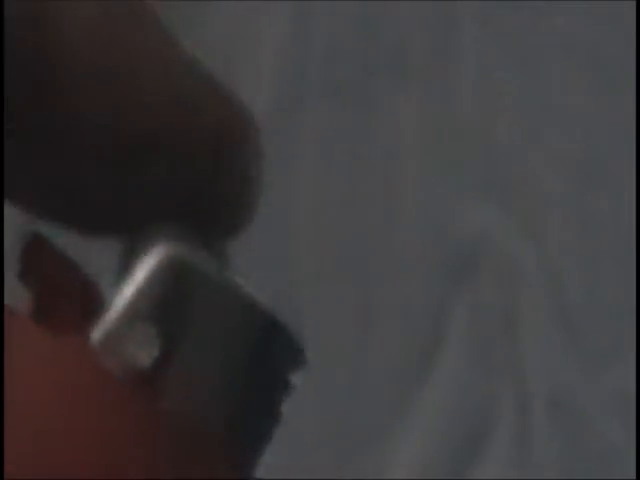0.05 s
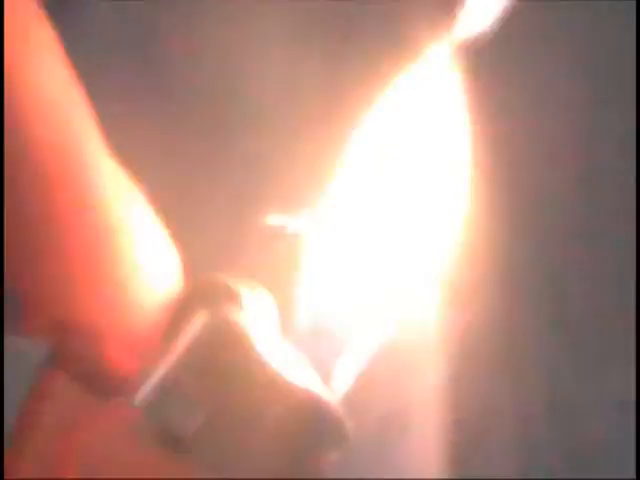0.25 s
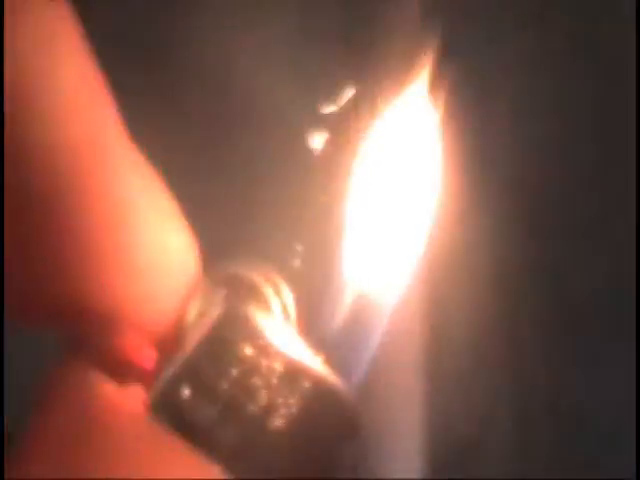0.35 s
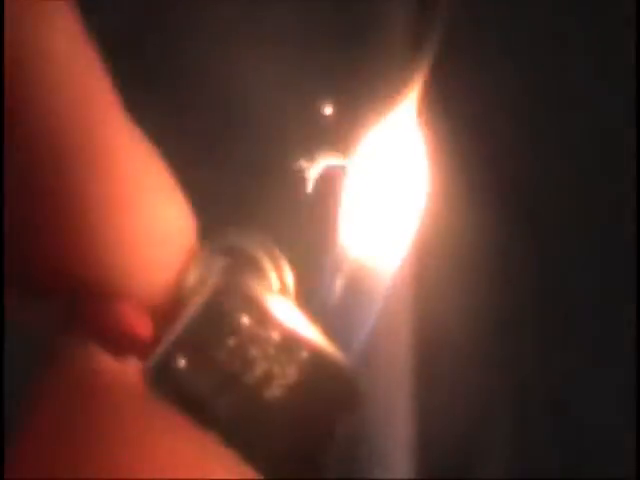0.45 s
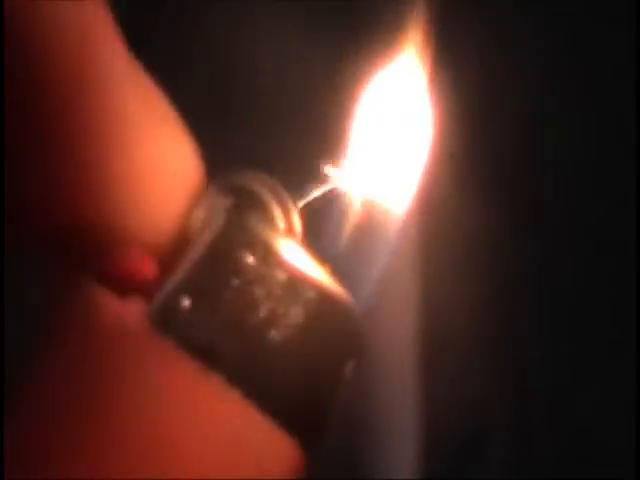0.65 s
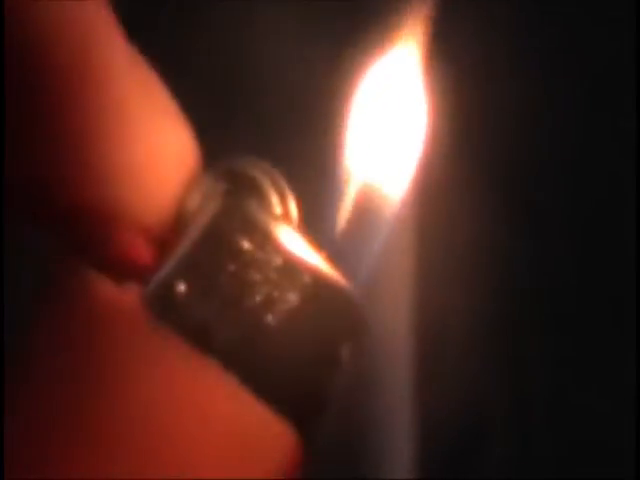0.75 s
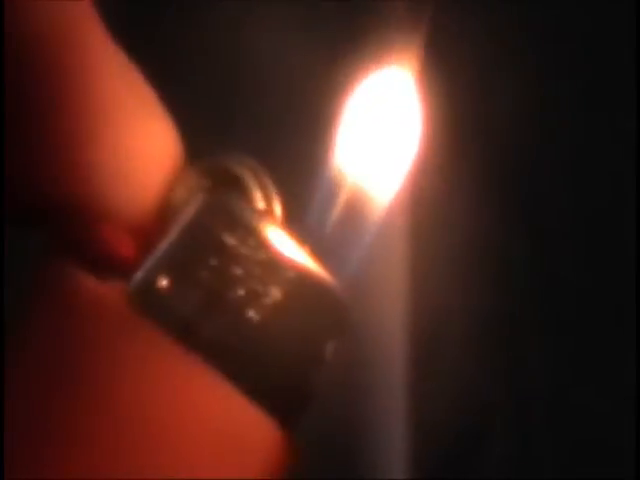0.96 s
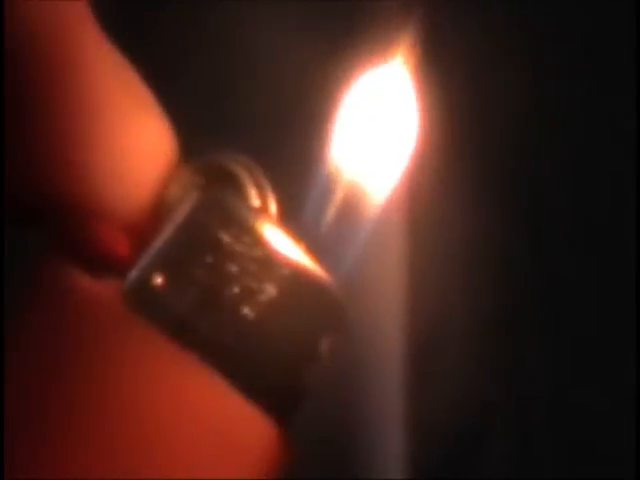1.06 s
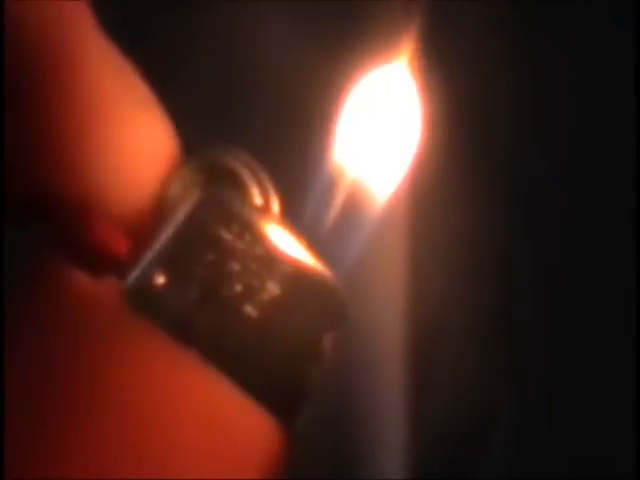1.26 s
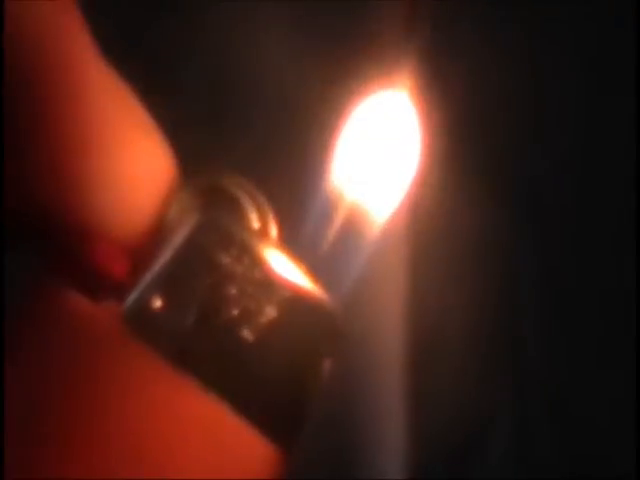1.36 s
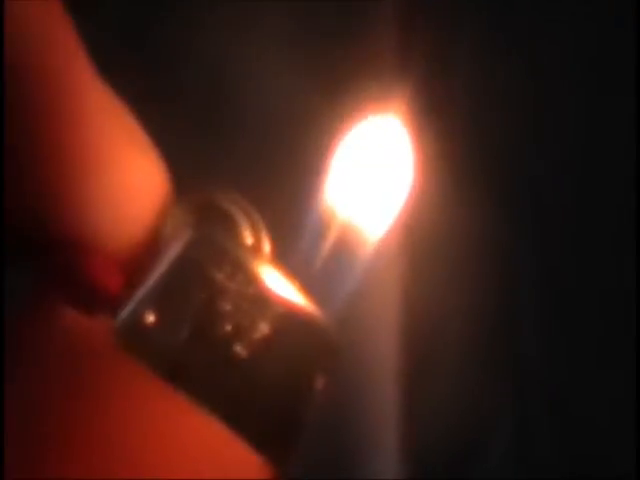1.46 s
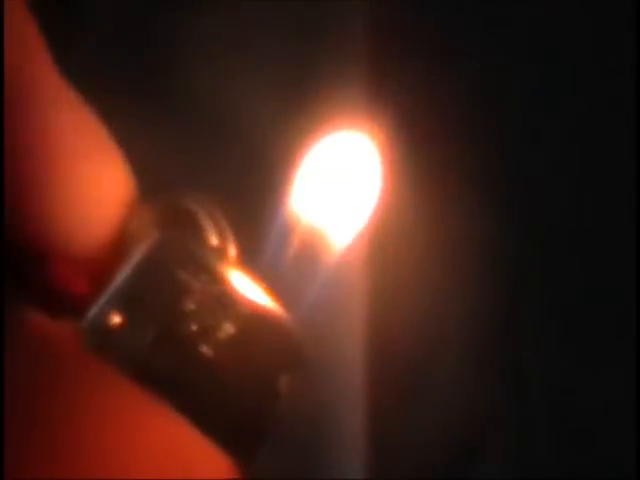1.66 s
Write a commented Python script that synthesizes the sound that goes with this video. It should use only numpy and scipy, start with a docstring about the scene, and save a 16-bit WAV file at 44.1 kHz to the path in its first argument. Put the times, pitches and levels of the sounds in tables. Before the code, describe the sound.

A flint lighter is struck once, close up and slightly right, in a small quiet room. Faint scratches and thumb rubbing lead to a quickening rasp at 0.2 seconds, ending in a loud, sharp snap with a spray of sparks at 0.25. The gas catches with a soft puff; its faint hiss peaks near 0.45, then fades through about 1.5 seconds. Light handling ticks fall between 0.45 and 0.7.

```python
"""Faint scratches under a thumb, then a quickening rasp and a sharp snap: a flint lighter, struck once.
It is held close to a stereo microphone, a little to the right, in a small quiet room.
The wheel rasps over the flint and throws sparks; the thumb snaps down onto the gas lever.
The gas catches with a soft puff and burns with a faint hiss, and the lighter ticks in the hand."""
import sys
import numpy as np
from scipy import signal
from scipy.fft import rfft, irfft
from scipy.io import wavfile

SR = 44100
rng = np.random.default_rng(int(sys.argv[2]) if len(sys.argv) > 2 else 0)


def wav_out(sig):
    """Save sig, one row per channel (or a flat mono array), as 16-bit PCM at SR to the path in sys.argv[1]."""
    wavfile.write(sys.argv[1], SR, np.round(np.clip(np.atleast_2d(sig).T, -1, 1) * 32767).astype(np.int16))


N = 74970
T = np.arange(N) / SR


# the rasp as the wheel bites, slips a little and speeds up: t/s, level/dB
WHEEL_STROKE = [(0.2112, -70), (0.2122, -45), (0.217, -43), (0.2245, -35), (0.231, -39), (0.237, -32),
                (0.243, -22), (0.248, -19), (0.2495, -70)]
# the wheel creeps under the thumb: t/s, half-width/s, level/dB
WHEEL_CREEPS = [(0.001, .005, -57.5), (0.017, .009, -54), (0.034, .004, -59), (0.127, .005, -57.5),
                (0.149, .009, -54.5), (0.168, .004, -53.5), (0.185, .006, -58), (0.203, .006, -52)]

def wheel():
    """Flint grains excite the wheel: a few scratchy creeps, then one accelerating stroke."""
    turning = (T > WHEEL_STROKE[0][0]) * (T < WHEEL_STROKE[-1][0])
    force = from_db(0.5) * envelope(WHEEL_STROKE) * turning
    creep = sum(from_db(db) * swell(s, half_width) for s, half_width, db in WHEEL_CREEPS)
    rasp = scrape(grains(per_s=16000, spread_db=0.5), bare_db=-14.5)
    scratch = scrape(grains(per_s=3000, spread_db=3.5), bare_db=-9)
    return force * rasp + creep * scratch


# resonances of the wheel on the flint: f/Hz, width/Hz, level/dB
WHEEL_RESONANCES = [(2144, 500, -10), (3471, 340, 7), (5900, 700, -12.5), (7660, 600, -8), (8330, 600, -5),
                    (10100, 820, -15), (12600, 700, -20)]

def scrape(grit, bare_db):
    """Grit heard bare and through the resonances of the wheel; rms 1."""
    ringing = sum((-1) ** k * from_db(db) * resonate(grit, hz, width)
                  for k, (hz, width, db) in enumerate(WHEEL_RESONANCES))
    bare = from_db(bare_db) * rolloff(grit, "low", hz=10000, order=2)
    return rms_one(rolloff(ringing + bare, "high", hz=1400, order=2))


# the lever snaps down and rattles: t/s, level/dB, share of ringing
LEVER_SNAPS = [(0.24848, 4, 1), (0.2541, -5, .12), (0.2617, -13, .12), (0.2683, -11, .12)]
# modes of the lever, hood and case: f/Hz, level/dB, t60/s
BODY_MODES = [(1209.6, -3, .0035), (1696, -6.5, 0.0055), (2527, -4, .0055), (3446, -8.5, .0065),
              (5049, 3.5, 0.0056), (6795, -12.5, 0.0049), (9065, 3.5, .007), (11250, -8.5, .003),
              (13110, -0.5, 0.0047), (15200, -4, .003)]
# the steel rings on faintly: f/Hz, level/dB, t60/s
STEEL_MODES = [(3400, -55, 0.56), (3740, -53, .28), (4920, -50, .25), (5380, -49.5, 0.26), (5620, -48, .33),
               (8902, -47, .22)]

def lever():
    """Each contact cracks, rings the body briefly and the steel a little longer."""
    rise_s = 0.00056
    ringing = (ring(BODY_MODES) + ring(STEEL_MODES)) * (1 - np.exp(-T / rise_s))
    crack = from_db(1) * contact()
    return sum(from_db(db + 0.5) * at_time(crack + share * ringing, s) for s, db, share in LEVER_SNAPS)


def contact():
    """A bare contact: a sharp click with a shallow dip in the treble."""
    click = rolloff(signal.unit_impulse(N) + 1e-18, "low", hz=11700, order=4)
    click = rolloff(click, "high", hz=700, order=1)
    return click - 0.2 * resonate(click, hz=6900, width=1800)


# sparks in the air, at close range: f/Hz, level/dB
SPARK_SPECTRUM = [(1000, -18.5), (3000, -1), (6000, -0.5), (10000, -2), (13000, -1), (16000, -12.5)]

def sparks():
    """A short spray of bright crackle, different on each side of the microphone."""
    peak_s, attack_s, decay_s = 0.2485, 0.00083, 0.004
    burst = np.exp(np.minimum((T - peak_s) / attack_s, (peak_s - T) / decay_s))
    sides = [rms_one(colour(grains(per_s=24000, spread_db=3.5), SPARK_SPECTRUM)) for _ in range(2)]
    return from_db(-13.5) * burst * np.array(sides)


# soft thuds of the thumb and the gas catching: t/s, level/dB, f/Hz, t60/s
AIR_PUFFS = [(0.2480, -33, 199.5, .02), (0.2702, -33, 430, 0.023), (0.2725, -37, 179.8, .045)]

def puffs():
    """Low, quickly damped pushes of air."""
    pushes = sum(at_time(ring([(hz, db, t60)]), s) for s, db, hz, t60 in AIR_PUFFS)
    return rolloff(pushes, "high", hz=90, order=2)


# the lighter ticks in the hand: t/s, level/dB, dull above f/Hz
HAND_TICKS = [(0.0697, -46, 2500), (0.1162, -44, 8000), (0.1325, -46, 11000), (0.1502, -38, 6000),
              (0.1667, -38, 9000), (0.4492, -37, 11000), (0.4720, -47, 14000), (0.4927, -41, 17000),
              (0.5083, -39, 2500), (0.5091, -33, 4500), (0.5252, -46, 14000), (0.5348, -47, 8000),
              (0.5580, -48, 9000), (0.6819, -33, 10000), (0.7325, -49, 1500)]

def ticks():
    """Light contacts, some duller than others; the fingers damp the body, so the bare click leads."""
    blow = contact() + from_db(-25) * ring(BODY_MODES, t60_scale=0.86) / len(BODY_MODES) ** 0.5
    blow = blow + from_db(2.5) * resonate(blow, hz=2400, width=510)   # the case resonates
    out = np.zeros(N)
    for s, db, hz in HAND_TICKS:
        tick = rolloff(blow, "low", hz, order=1)
        out += from_db(db) * at_time(tick / np.abs(tick).max(), s)
    return out


# the hiss rises, then settles as the flame steadies: t/s, level/dB
JET_LEVEL = [(0.24, -30), (0.28, -9), (0.45, 5), (0.6, -1), (0.8, -1.5), (0.96, -4), (1.1, -7.5),
             (1.7, -14)]
# the jet, close to the nozzle: f/Hz, level/dB per Hz
JET_SPECTRUM = [(100, -105), (600, -101), (1400, -102), (2200, -99), (4000, -107), (6500, -114),
                (9000, -113), (12000, -122), (16000, -125)]
# the hiss takes on a pitch for a moment: t/s, half-width/s, f/Hz, width/Hz, level/dB
JET_SWELLS = [(0.785, .06, 2100, 350, -71), (0.952, 0.055, 4160, 1500, -72.5),
              (1.51, 0.046, 1290, 900, -72)]

def gas():
    """The jet hisses from the nozzle once the lever is down, with a few narrow swells."""
    white = rng.standard_normal(N)
    jet = colour(white, JET_SPECTRUM) * np.sqrt(SR / 2) * envelope(JET_LEVEL)
    pitched = sum(from_db(db) * swell(s, half_width) * rms_one(resonate(white[::-1], hz, width))
                  for s, half_width, hz, width, db in JET_SWELLS)
    return jet + pitched


# the flame's crackle: f/Hz, level/dB
CRACKLE_SPECTRUM = [(1000, -36), (5000, -10), (7500, 6), (9200, 7.5), (12000, -24), (16000, -5.5)]
# the flame's waver: f/Hz, level/dB per Hz
WAVER_SPECTRUM = [(30, -104), (65, -85), (150, -100), (500, -103), (1100, -100), (2000, -106), (4000, -118),
                  (16000, -135)]

def flame():
    """The flame crackles finely as it takes hold and later wavers in a draught."""
    crackle = from_db(-73) * rms_one(colour(grains(per_s=700, spread_db=6.4), CRACKLE_SPECTRUM))
    waver = noise(WAVER_SPECTRUM)
    return crackle * swell(s=0.57, half_width=0.083) + waver * swell(s=1.486, half_width=0.12)


# the thumb rubs on the lighter: t/s, level/dB
RUB_LEVEL = [(0, 2), (0.1, -1), (0.2, 0), (0.35, -11), (0.52, -7), (0.65, -16.5), (1.7, -29)]
# skin on the case, close up: f/Hz, level/dB per Hz
RUB_SPECTRUM = [(60, -105), (180, -88.5), (500, -95.5), (1000, -102), (1800, -93.5), (3000, -103),
                (6000, -112), (10000, -120), (16000, -128)]

def rub():
    """Skin shifts on the case, most of all before the strike."""
    return noise(RUB_SPECTRUM) * envelope(RUB_LEVEL)


# decay of the small room: f/Hz, t60/s
ROOM_DECAY = [(150, 0.7), (1000, 0.4), (2500, 0.37), (5500, 0.3033), (9000, 0.2734), (14000, 0.2)]
# its reflections at the microphone: f/Hz, level/dB
ROOM_SPECTRUM = [(100, -9), (400, -4.5), (800, -9), (1700, -5), (2500, 1.5), (3500, 4), (4250, -2),
                 (5000, 3), (5500, 9), (6200, -1), (7500, 0.5), (8900, 6.5), (9700, -1.5), (11000, -3),
                 (13000, -9), (16000, -9)]

def room(x):
    """The walls return a diffuse tail that dies sooner in the treble."""
    delay_s, side_db = 0.0023, -9.5
    hz, centres = np.fft.rfftfreq(N, 1 / SR), np.array(ROOM_DECAY)[:, 0]
    white = stereo(rng.standard_normal(N), from_db(side_db) * rng.standard_normal(N))
    spectrum = rfft(white) * from_db(at_hz(ROOM_SPECTRUM, hz))
    tail = 0
    for weights, (_, t60) in zip(np.eye(len(centres)), ROOM_DECAY):
        band = irfft(spectrum * at_hz(np.c_[centres, weights], hz), N)
        decay = from_db(-60 * T / t60)
        tail = tail + band * decay / np.sqrt(np.sum(decay ** 2))
    return signal.fftconvolve(tail * (T > delay_s), x[None], axes=1)[:, :N]


# room tone at the microphone, mid and side: f/Hz, level/dB per Hz
TONE_MID = [(20, -96.5), (60, -87.5), (120, -91.5), (250, -93), (500, -99), (1200, -102), (3000, -108),
            (6000, -114), (10000, -117), (16000, -119)]
TONE_SIDE = [(20, -100), (60, -93), (150, -93), (380, -93), (800, -94), (1500, -100), (3000, -106),
             (6000, -114), (10000, -118), (16000, -120)]

def room_tone():
    """The quiet room all around, with a trace of mains hum in the centre."""
    hum_hz, hum_db = 121.7, -71
    hum = from_db(hum_db) * np.sqrt(2) * np.sin(2 * np.pi * hum_hz * T)
    return stereo(noise(TONE_MID), noise(TONE_SIDE)) + hum


def from_db(db):
    """Decibels to gain."""
    return 10 ** (np.asarray(db) / 20)


def rms_one(x):
    """Scale to rms 1."""
    return x / np.sqrt(np.mean(x ** 2) + 1e-20)


def envelope(points):
    """Gain over time from a table of t/s, level/dB."""
    return from_db(np.interp(T, *np.transpose(points)))


def swell(s, half_width):
    """A bell curve that peaks at time s."""
    return np.exp(-((T - s) / half_width) ** 2)


def at_hz(points, hz):
    """Read a table on a log-frequency axis."""
    points = np.array(points)
    return np.interp(np.log(np.maximum(hz, 1)), np.log(points[:, 0]), points[:, 1])


def colour(x, points):
    """Shape a steady signal by a table of f/Hz, level/dB."""
    return irfft(rfft(x) * from_db(at_hz(points, np.fft.rfftfreq(N, 1 / SR))), N)


def noise(points):
    """Steady noise from a table of f/Hz, level/dB per Hz."""
    return colour(rng.standard_normal(N), points) * np.sqrt(SR / 2)


def stereo(mid, side):
    """Left and right from mid and side."""
    return np.array([mid + side, mid - side])


def at_time(x, s):
    """Delay a sound to start at s."""
    return np.concatenate([np.zeros(int(s * SR)), x])[:N]


def ring(modes, t60_scale=1):
    """Struck modes: decaying sines with alternating signs."""
    return sum((-1) ** k * from_db(db - np.minimum(60 * T / (t60 * t60_scale), 300))
               * np.sin(2 * np.pi * hz * T) for k, (hz, db, t60) in enumerate(modes))


def grains(per_s, spread_db):
    """Random clicks of uneven size, rms 1."""
    sizes = from_db(spread_db * np.minimum(rng.exponential(1, N), 4)) * rng.choice([-1, 1], N)
    return rms_one(sizes * (rng.random(N) < per_s / SR))


def resonate(x, hz, width):
    """A resonance of gain 1, its width in Hz."""
    r = np.exp(-np.pi * width / SR)
    feedback = [1, -2 * r * np.cos(2 * np.pi * hz / SR), r * r]
    return signal.lfilter(np.array([1, 0, -1]) * (1 - r * r) / 2, feedback, x)


def rolloff(x, kind, hz, order):
    """A low-pass or high-pass filter."""
    return signal.sosfilt(signal.butter(order, hz, kind, fs=SR, output="sos"), x)


def scene():
    """The lighter, close and a little to the right; the snaps and the rasp wake the room."""
    rasp = wheel()
    lighter = rasp + lever() + ticks() + puffs() + rub()
    pan = from_db([[-0.94], [0.94]])
    clicks = sum(from_db(db) * share * at_time(signal.unit_impulse(N), s) for s, db, share in LEVER_SNAPS)
    tail = room(clicks + from_db(-20.5) * rasp)
    return lighter * pan + sparks() + tail + gas() + flame() + room_tone()


def record(dry):
    """At this distance the snap overloads the microphone; the top of the treble is cut."""
    ceiling, stopband_hz = 0.81, 16500
    rounded = dry / (1 + (dry / ceiling) ** 4) ** (1 / 4)
    return signal.sosfilt(signal.cheby2(16, 60, stopband_hz, fs=SR, output="sos"), rounded)


dry = scene()
out = record(dry)
wav_out(out)
```